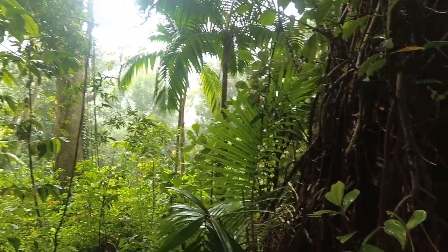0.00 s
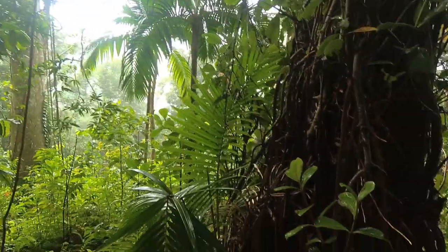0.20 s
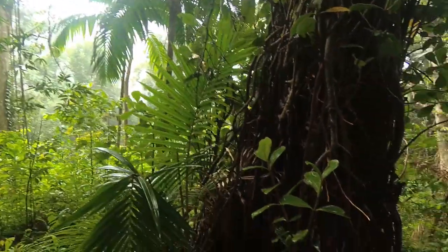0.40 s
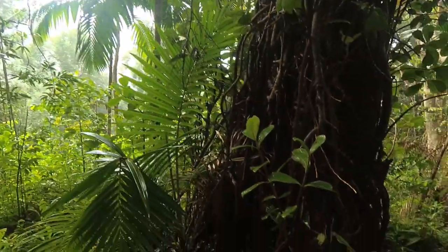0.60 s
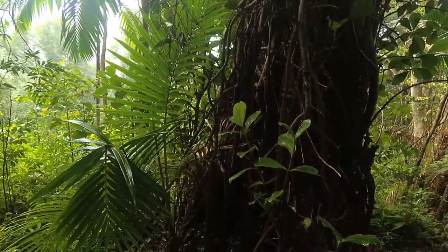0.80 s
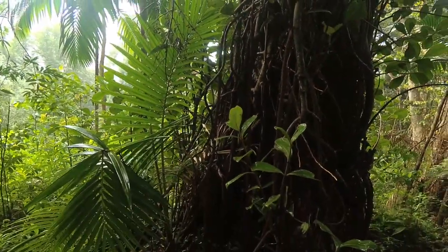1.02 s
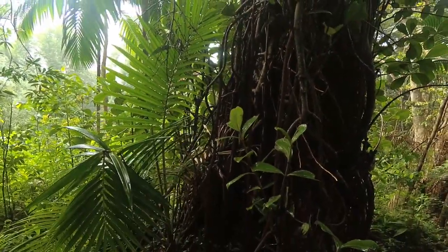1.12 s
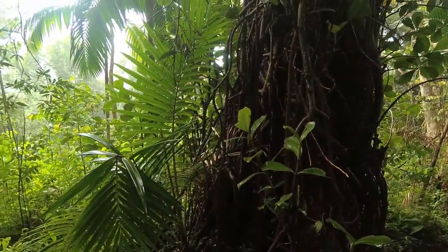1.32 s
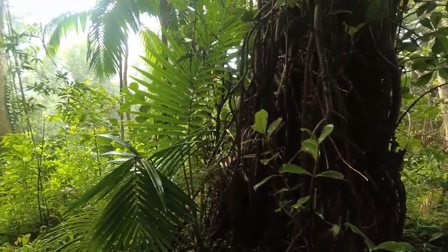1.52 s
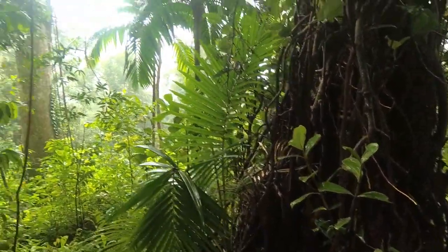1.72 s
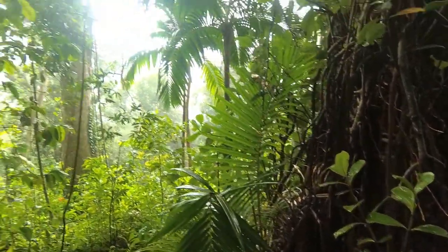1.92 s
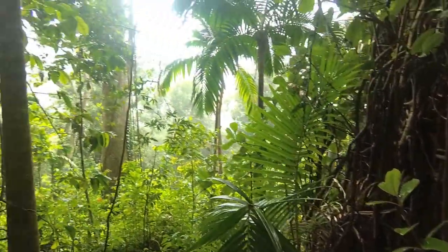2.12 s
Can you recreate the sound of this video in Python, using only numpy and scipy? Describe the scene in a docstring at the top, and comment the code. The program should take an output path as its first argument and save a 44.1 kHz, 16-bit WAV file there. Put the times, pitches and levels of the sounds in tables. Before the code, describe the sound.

Handling noise on a small plastic camera: a loud distorted knock early, scratchy finger rubbing and soft low bumps, then a second clear click midway, above a faint steady chorus of far rainforest animals and hiss.

```python
"""In a rainforest, a small hand-held camera hears a far, smeared chorus of animals, like steady noise, over a
soft hiss. Its plastic housing is a modal resonator, knocked three times (once into overload) and rubbed by
slipping fingers. Grip shifts are short pressure pulses, the restless hand a low rumble, the ticks bursts of
bright noise. A faint high tone burst repeats about 24 times a second. The chorus is random impulses coloured by
resonances of the housing; the hiss of leaves and distant insects is shaped noise."""
import sys
import numpy as np
from scipy import signal
from scipy.fft import rfft, irfft, next_fast_len
from scipy.io import wavfile
from scipy.ndimage import map_coordinates

SR = 44100
rng = np.random.default_rng(int(sys.argv[2]) if len(sys.argv) > 2 else 0)


def generate_wav(signal):
    """Clip the signal to [-1, 1] and save it as 16-bit WAV at the path in sys.argv[1]."""
    frames = np.transpose(np.atleast_2d(signal))
    scaled = np.clip(frames, -1, 1) * 32767
    pcm = np.round(scaled).astype(np.int16)
    wavfile.write(sys.argv[1], SR, pcm)


def rack_gain(trim_db):
    """Turn a fader trim in dB into the linear factor to multiply a signal by."""
    fader = np.asarray(trim_db, float)
    return 10 ** (fader / 20)


N = 97020
T = np.arange(N) / SR


def unit(x):
    """Normalization: scale to an rms of 1."""
    return x / np.sqrt(np.mean(x ** 2) + 1e-20)


def along(points, hz):
    """Logarithmic interpolation: a curve through (frequency [Hz], value) points on a log axis."""
    point_hz, value = np.transpose(points)
    return np.interp(np.log(hz + 1), np.log(point_hz + 1), value)


def wobble(rate):
    """Random modulation: a smooth curve through `rate` random knots a second."""
    knots = rng.standard_normal(int(N * rate / SR) + 4)
    return map_coordinates(knots, [T * rate])


def filtered(x, response):
    """Linear filtering: the spectrum of x times a complex response of frequency."""
    size = next_fast_len(N + SR // 2)
    spectrum = rfft(x, size) * response(np.fft.rfftfreq(size, 1 / SR))
    return irfft(spectrum, size)[..., :N]


def peak(f, hz, width_hz):
    """Resonance: the causal response of one damped oscillator, 1 at its centre."""
    return 1j * f * width_hz / (hz * hz - f * f + 1j * f * width_hz)


def passed(f, lo_hz, hi_hz):
    """Band limiting: a causal second-order high-pass and low-pass."""
    high_pass = 1j * f / lo_hz / (1 + 1j * f / lo_hz)
    low_pass = 1 / (1 + 1j * f / hi_hz)
    return (high_pass * low_pass) ** 2


def ports(pan_db, lead):
    """Interaural-style cues: gain and phase at two microphone ports; only the later one is held back."""
    lag = np.array([np.maximum(-lead, 0), np.maximum(lead, 0)])
    return rack_gain([[pan_db / 2], [-pan_db / 2]]) * np.exp(-1j * lag).reshape(2, -1)


def grains(per_s, spread_db, count=1):
    """Shot noise: random impulses of scattered size, rms 1."""
    chance = rng.random((count, N))
    size, spread = rng.standard_normal((2, count, N))
    return unit((chance < per_s / SR) * size * rack_gain(spread_db * spread))


# Vibration modes of the plastic housing: (frequency [Hz], level [dB], t60 before the grip shortens it [s],
# left over right [dB], left leads at the mode's frequency [rad], polarity [+1 or -1])
HOUSING_MODES = [(200, 5, .018, 2, 2.2, -1), (560, -20, .02, -4, 0, 1), (810, 1, .024, 4, -.2, 1),
                 (1092, 0, .022, 4, -.4, 1), (1320, -12, .02, -1, -.3, 1), (1750, 3.5, .023, -3, -.6, 1),
                 (2250, -3, .01, 2, -.9, -1), (2760, 3.5, .016, 3, -1.2, 1), (3480, 4, .011, -1, -1.4, 1),
                 (4550, -10, .005, -3, -2, 1), (5800, -4, .008, 0, -2.5, 1), (6350, -2, .007, 2, -2.5, 1),
                 (7400, -9, .005, 2, -2, 1), (8900, -11, .004, 0, -1, 1), (10700, -8, .003, 0, 1, 1),
                 (14500, -4, .003, -3, 0, 1)]


def housing(force, ring_share):
    """Modal superposition: a force rings all modes, each heard differently at the two ports."""
    def ring(f):
        total = 0
        for hz, db, t60, pan_db, lead, polarity in HOUSING_MODES:
            width_hz = np.log(1000) / np.pi / t60 / ring_share  # damping by the grip widens the mode
            # a lead that grows with frequency is a pure delay
            total = total + polarity * rack_gain(db) * peak(f, hz, width_hz) * ports(pan_db, lead * f / hz)
        return total
    return filtered(force, ring)


CONTACT_ROUGH = 0.035  # roughness relative to the blow

# Knocks and the strongest finger slips: (time [s], peak level before overload [dB], contact length [s],
# dull above [Hz], thin below [Hz], share of ring time left by the grip [0-1])
IMPACTS = [(.2412, 25, .004, 4500, 180, .85), (1.164, -14, .002, 6000, 600, .95),
           (1.9755, -38, .001, 1200, 700, .7), (.3415, -25, .004, 400, 800, .6),
           (.378, -30, .002, 400, 800, .6), (.3905, -21, .002, 400, 800, .6),
           (.408, -22, .004, 400, 800, .6), (.4175, -17, .002, 500, 800, .6),
           (.4225, -15, .002, 500, 800, .6), (.496, -24, .006, 800, 1000, .6)]


def knocks():
    """Impact excitation: a sharp blow and a short rough contact that fades away ring the housing."""
    s, db, length, hi_hz, lo_hz, ring_share = np.transpose(IMPACTS)[:, :, None]
    contact = (T >= s) * np.exp(-((T - s) / length) ** 2)
    force = CONTACT_ROUGH * contact * rng.standard_normal((len(s), N))
    force -= np.arange(N) == np.round(s * SR)  # the blow, one sample long
    force = filtered(force, lambda f: passed(f, lo_hz, hi_hz))
    ring = housing(force[:, None], ring_share[:, None])
    ring /= np.abs(ring).max(axis=(1, 2), keepdims=True)
    return np.sum(rack_gain(db)[:, None] * ring, axis=0)


SLIPS_PER_S, SLIP_SPREAD_DB = 4500, 3
RUB_RING_SHARE = 0.45  # share of ring time left by the grip
RUB_HISS_HZ, RUB_HISS_WIDTH_HZ = 13500, 3500  # centre, and width of each of two equal resonances

# Course of the finger rub: (time [s], level [dB], level of its treble hiss [dB])
RUB_COURSE = [(0, -39, -73), (.008, -37.5, -72), (.024, -60, -75), (.068, -50, -80), (0.075, -43.5, -83),
              (.1, -46, -83), (.16, -56, -78), (0.201, -39.5, -53), (.23, -48, -72), (.28, -45, -82),
              (0.324, -47, -76), (0.339, -36, -85), (.37, -31.5, -63), (.39, -31, -61), (.4, -28, -74),
              (0.422, -27, -54), (0.431, -29.5, -59), (.465, -36, -55), (0.49, -37.5, -58),
              (0.499, -29, -48), (0.512, -46.5, -52), (.55, -47.5, -64), (.6, -62, -80), (.64, -70, -88)]
# Colour of the skin's slips: (frequency [Hz], relative level [dB])
SLIP_COLOUR = [(100, -25), (250, -29), (450, -1.5), (650, -7.5), (950, 11), (1300, -1), (1750, -7.5),
               (2300, -4), (2800, -14), (3500, -14.5), (5000, -26), (9000, -37)]


def rub():
    """Friction excitation: skin slips in dense uneven grains into the housing, under a thin hiss."""
    s, db, hiss_db = np.transpose(RUB_COURSE)
    level = rack_gain(np.interp(T, s, db, right=-120))
    hiss_level = rack_gain(np.interp(T, s, hiss_db, right=-120))
    slips = grains(SLIPS_PER_S, SLIP_SPREAD_DB)[0]
    slips = filtered(slips, lambda f: rack_gain(along(SLIP_COLOUR, f)))
    steady_rms = np.sqrt(np.mean(housing(slips, RUB_RING_SHARE) ** 2))
    noise = rng.standard_normal((2, N))
    fizz = unit(filtered(noise, lambda f: peak(f, RUB_HISS_HZ, RUB_HISS_WIDTH_HZ) ** 2))
    return housing(slips * level, RUB_RING_SHARE) / steady_rms + fizz * hiss_level


PUSH_CYCLES = 0.5  # cycles from the centre until the envelope falls to 1/e
GRIP_PAN_DB = 2.5  # left over right, for pushes and rumble

# Grip shifts, one soft push each: (time [s], envelope peak before panning [dB], frequency [Hz])
GRIP_PUSHES = [(0.096, -34.5, 174), (0.122, -37.5, 186), (0.161, -35.5, 173), (0.197, -30.5, 196),
               (0.269, -36.5, 202), (0.298, -39.5, 124), (0.392, -64, 200), (0.422, -38, 131),
               (.543, -41.5, 190), (0.576, -32, 183), (0.771, -35, 174), (0.942, -48.5, 152),
               (1.658, -39, 188), (1.718, -43, 215), (1.753, -43, 198), (1.778, -37.5, 167),
               (1.849, -42.5, 243), (1.929, -40.5, 225), (2.189, -36, 139)]


def pushes():
    """Pressure pulses: each shift of grip is about one Gaussian-windowed cycle of random phase."""
    out = np.zeros(N)
    for s, db, hz in GRIP_PUSHES:
        window = np.exp(-((T - s) * hz / PUSH_CYCLES) ** 2)
        out += rack_gain(db) * window * np.cos(2 * np.pi * hz * (T - s) + rng.uniform(0, 2 * np.pi))
    return out * rack_gain([[GRIP_PAN_DB / 2], [-GRIP_PAN_DB / 2]])


# Tiny dry ticks: (time [s], starting level before the band limits [dB])
TICK_TIMES = [(0.0335, -42), (0.7444, -49), (0.7613, -40), (1.3814, -52), (1.4594, -50)]


def ticks():
    """Transient noise: abrupt onsets with exponential decay make very short bright crackles."""
    gate = np.zeros(N)
    for s, db in TICK_TIMES:
        gate += rack_gain(db) * (T >= s) * np.exp(-np.abs(T - s) / 0.0024)  # decay constant in s
    return filtered(gate * rng.standard_normal((2, N)), lambda f: passed(f, 4000, 30000))


RUMBLE_HZ, RUMBLE_WIDTH_HZ = 158, 156  # centre, and width of each of two equal resonances
RUMBLE_LUMPS_DB = 4  # per unit of the random curve

# Course of the grip rumble: (time [s], level before lumps and panning [dB])
RUMBLE_COURSE = [(0.6, -73), (0.786, -60), (1.116, -68), (1.78, -58), (1.922, -62), (2.2, -57.5)]


def rumble():
    """Band-limited noise: the holding hand never rests and makes a lumpy low rumble."""
    s, db = np.transpose(RUMBLE_COURSE)
    noise = rng.standard_normal(N)
    low = unit(filtered(noise, lambda f: peak(f, RUMBLE_HZ, RUMBLE_WIDTH_HZ) ** 2))
    level = rack_gain(np.interp(T, s, db) + RUMBLE_LUMPS_DB * wobble(30.18))
    return low * level * rack_gain([[GRIP_PAN_DB / 2], [-GRIP_PAN_DB / 2]])


BLIPS_PER_S, BLIP_FIRST_S = 23.976, 0.0335
BLIP_HZ, BLIP_S = 11250, 0.0017  # tone, and time from the centre until it falls to 1/e
BLIP_DB, BLIP_PAN_DB = -56, 5  # mean peak level before panning, and left over right


def blips():
    """Periodic amplitude modulation: a brief high tone at a strictly even rate, stronger on the left."""
    cycle = ((T - BLIP_FIRST_S) * BLIPS_PER_S + 0.5) % 1 - 0.5  # 0 at the centre of each blip
    window = np.exp(-(cycle / BLIPS_PER_S / BLIP_S) ** 2)
    tone = window * np.sin(2 * np.pi * BLIP_HZ * T)
    return rack_gain(BLIP_DB + 0.62 * wobble(28)) * tone * rack_gain([[BLIP_PAN_DB / 2], [-BLIP_PAN_DB / 2]])


CALLS_PER_S, CALL_SPREAD_DB = 1800, 1
SWELL_DB, FLUTTER = 1.0, 0.8  # per unit of the slow curve, and share of the fast curve

# Resonances of the housing that colour the chorus: (frequency [Hz], width before the widening factor [Hz],
# level before swelling [dB], # left over right [dB], left leads [rad], likeness of the two sides [0-1])
CHORUS_BANDS = [(246, 160, -57, -6, 1, 0.27), (1060, 190, -55, 2.5, -.4, .9),
                (1566, 36, -66.5, -70, 5.5, 0.6), (2104, 61, -58.5, -31, 0.7, 1),
                (2245, 440, -56.5, -4, -5.5, 1), (2955, 230, -59, -0.5, -5.5, 0.92),
                (3361, 290, -56, -5, -0.9, 0.58), (3560, 430, -54, 8, -3, 0.74)]


def chorus():
    """Superposition: countless short far calls merge into steady noise, coloured by resonances of the housing;
    each band swells on its own."""
    out = np.zeros((2, N))
    for hz, width_hz, db, pan_db, lead, alike in CHORUS_BANDS:
        shared, left, right = grains(CALLS_PER_S, CALL_SPREAD_DB, count=3)
        alike = np.clip(alike, 0, 1)
        calls = np.sqrt(alike) * shared + np.sqrt(1 - alike) * np.array([left, right])
        band = filtered(calls, lambda f: peak(f, hz, 1.06 * width_hz) ** 2 * ports(pan_db, lead))
        swell_db = SWELL_DB * (wobble(8.11) + FLUTTER * wobble(25.22))
        out += unit(band) * rack_gain(db + swell_db)
    return out


HISS_DB, HISS_SWELL_DB = -50, 0.6  # rms before swelling, and swell per unit of the random curve

# Spectrum of the hiss shared by both sides: (frequency [Hz], relative level [dB])
HISS_SHARED = [(30, -5), (100, -7.5), (500, -4.5), (1400, -5.5), (2700, -11), (4200, -11.5), (5000, -14.5),
               (8000, -19), (12000, -19), (15300, -18.5), (15500, -70)]
# Spectrum of the hiss opposed between the sides: (frequency [Hz], relative level [dB])
HISS_OPPOSED = [(30, -36), (100, -7.5), (600, -9), (1400, -14.5), (2800, -16), (4200, -5.5), (5500, -10),
                (8000, -19), (12000, -18.5), (15300, -22), (15500, -74)]


def hiss():
    """Spectral shaping of white noise: leaves and distant insects merge into a smooth hiss."""
    noise = rng.standard_normal((2, N))
    mid, side = filtered(noise, lambda f: rack_gain([along(HISS_SHARED, f), along(HISS_OPPOSED, f)]))
    return rack_gain(HISS_DB + HISS_SWELL_DB * wobble(5.5)) * unit(np.array([mid + side, mid - side]))


def scene():
    """Linear superposition of hands, blips and forest; only the knocks reach the top of the range."""
    soft = rub() + pushes() + ticks() + rumble() + blips() + chorus() + hiss()
    return filtered(soft, lambda f: f < 15400) + knocks()


def top_cut(x):
    """Nothing passes above the cut-off."""
    return signal.sosfilt(signal.butter(12, 16560, fs=SR, output="sos"), x)


def record(dry):
    """Saturation: the input is nearly linear up to a ceiling, then flattens the peaks."""
    ceiling, hardness = 0.99, 13
    mix = dry / (1 + np.abs(dry / ceiling) ** hardness) ** (1 / hardness)
    return top_cut(mix)


dry = scene()
out = record(dry)
generate_wav(out)
```